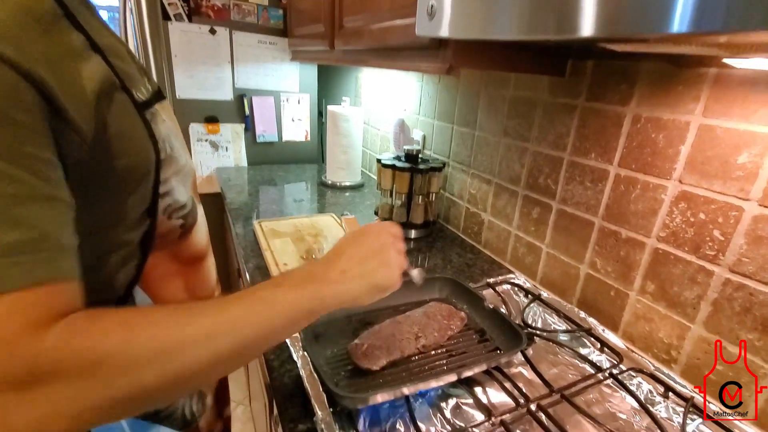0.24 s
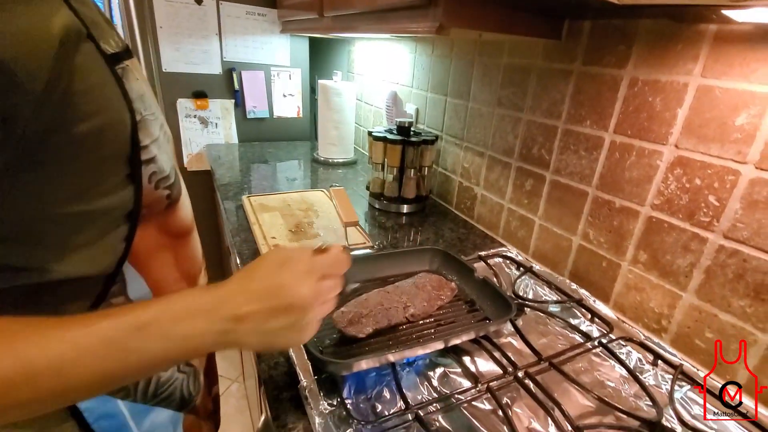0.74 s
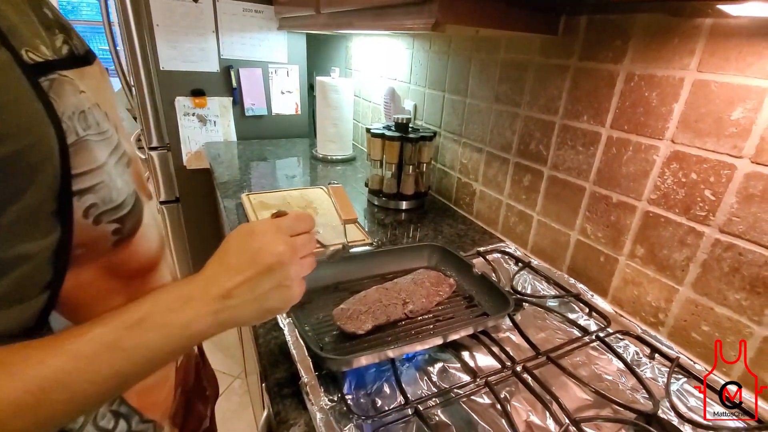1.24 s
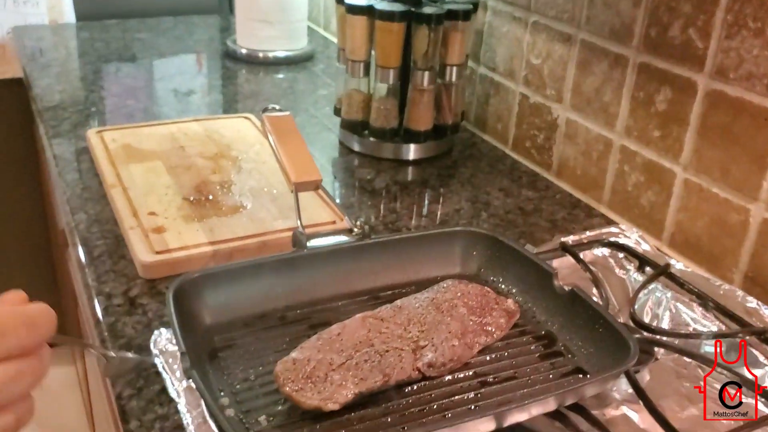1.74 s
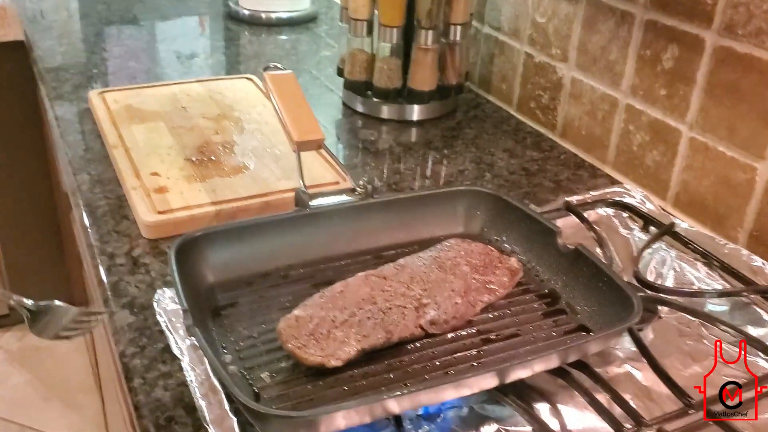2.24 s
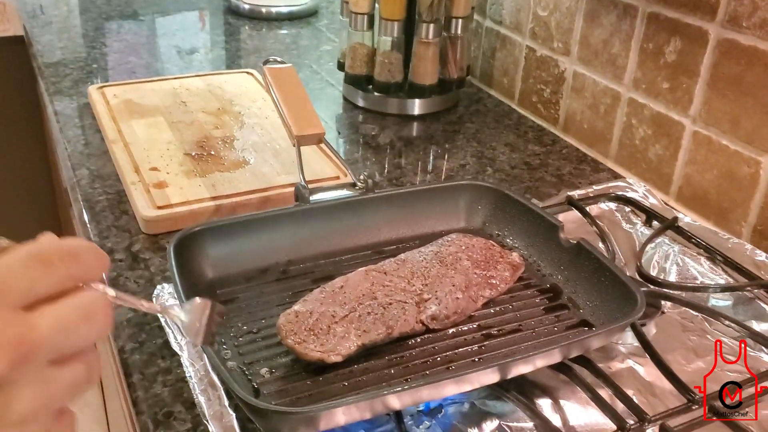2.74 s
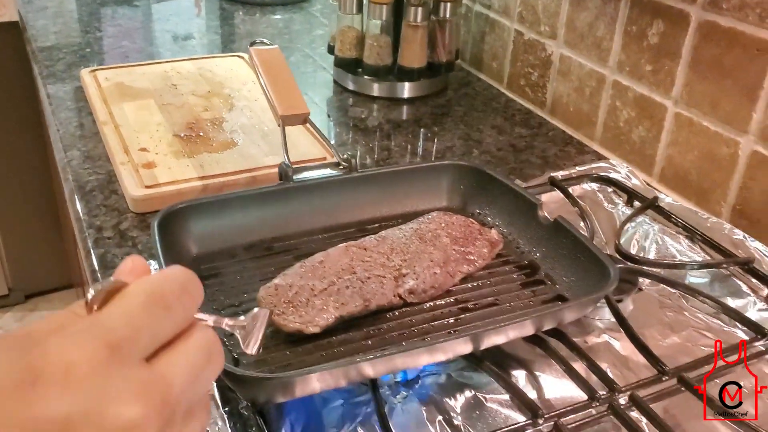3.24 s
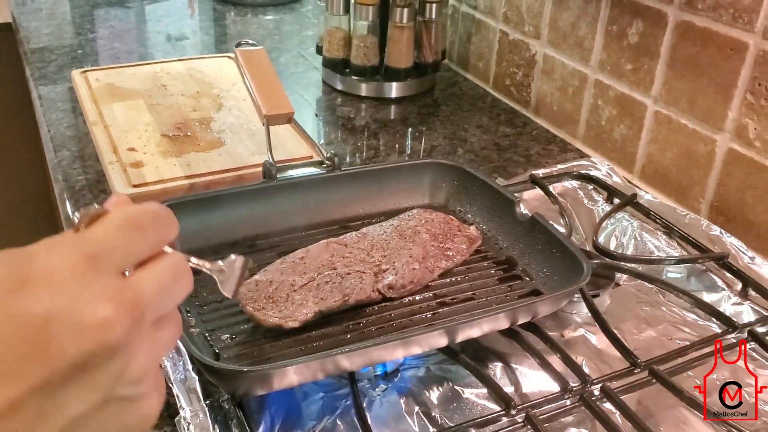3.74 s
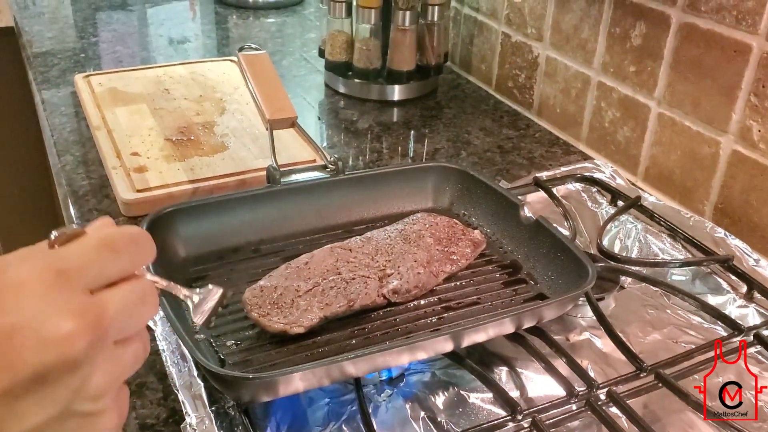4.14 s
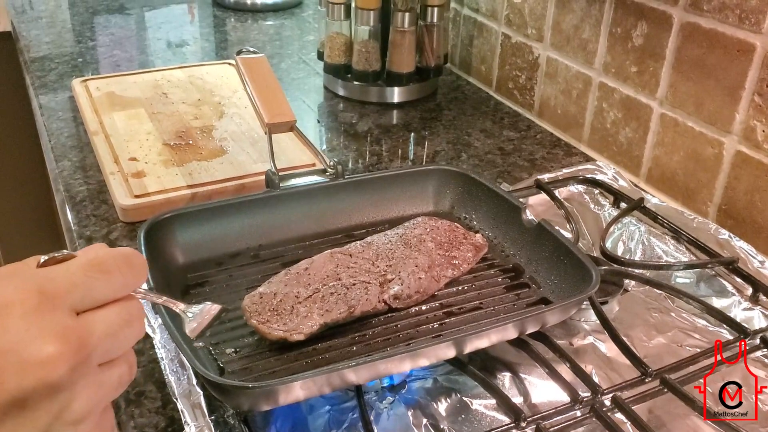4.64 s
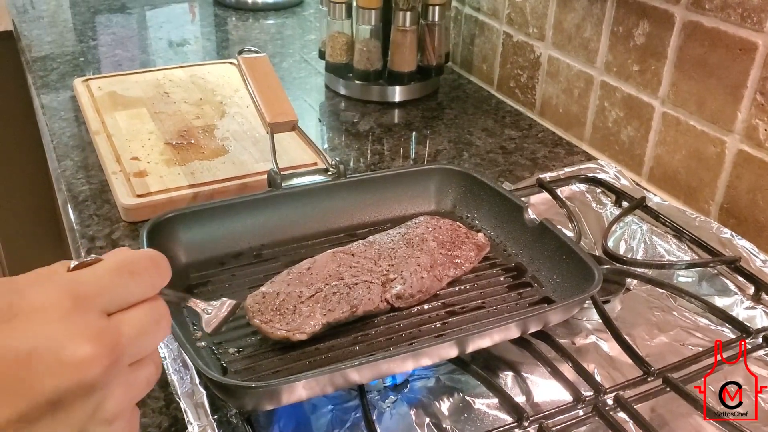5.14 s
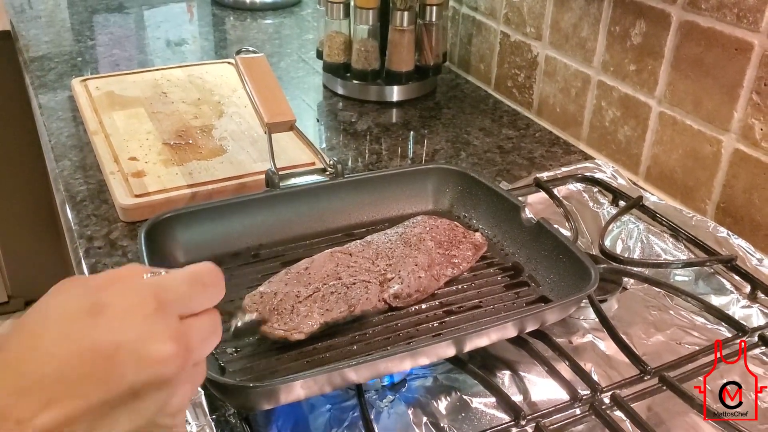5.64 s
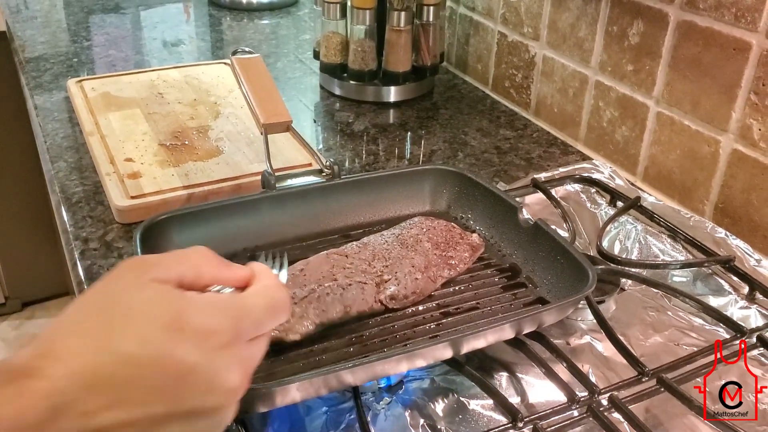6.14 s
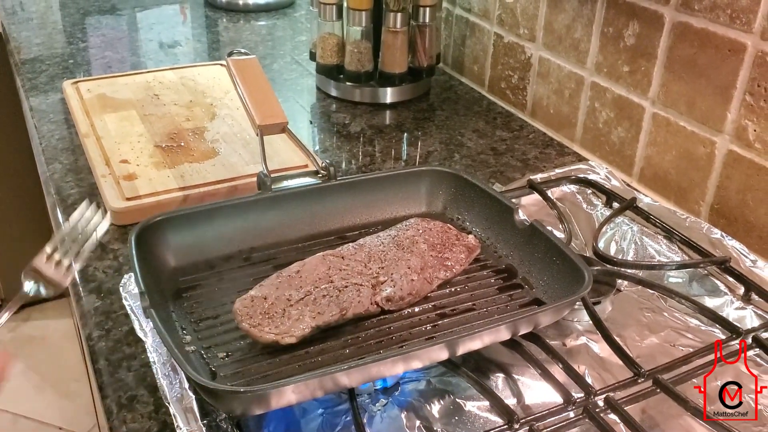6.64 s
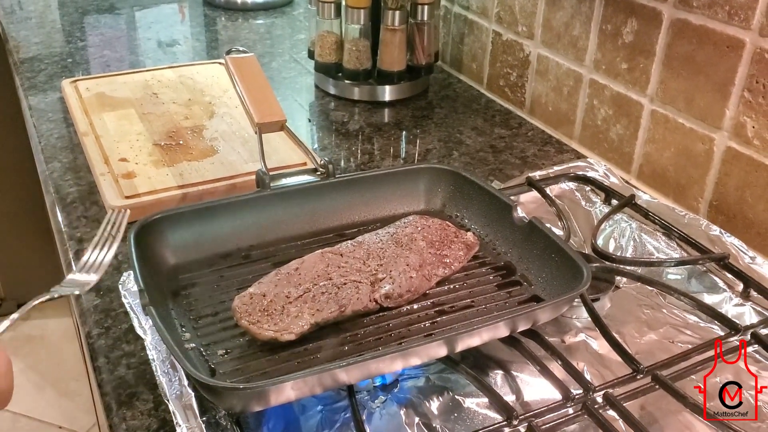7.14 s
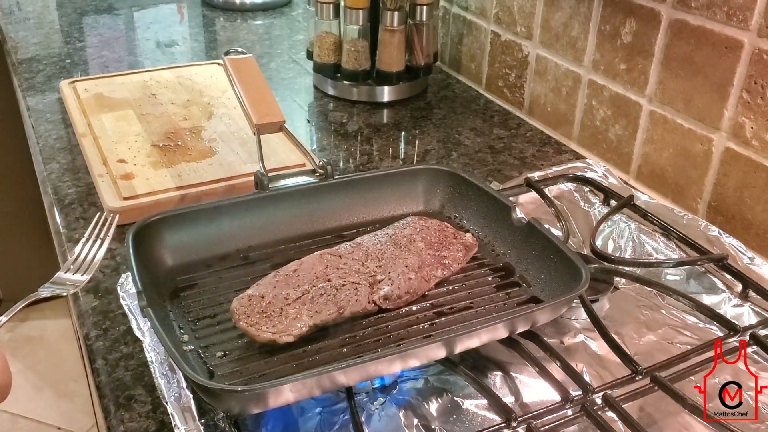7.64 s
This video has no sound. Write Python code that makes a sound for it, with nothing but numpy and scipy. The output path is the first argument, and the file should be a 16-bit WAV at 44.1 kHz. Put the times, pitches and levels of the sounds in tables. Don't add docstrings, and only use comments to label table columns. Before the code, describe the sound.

Two close microphones at a gas hob in a tiled home kitchen. Meat sizzles without pause for nearly 8 seconds: crisp high fizz over a coarser wet boil, uneven in tiny spurts. It begins with a brief fizzing surge; from 0.45 to 1 s there is a dense run of loud cracks, spits and dull bubble thuds, strongest near 0.65. From 1 to 3 s it is calmer, with a wet pop at 1.95 and a few snaps. Between 3 and 5.5 s small surges and scattered pops come left and right, the iron singing faintly. Around 6.05-6.4 s it spits busily, with soft low bumps from the cook, as also near 0.5, 1.1 and 7.2. Sparse crackles continue to the end. Quietly beneath, the flame flutters and roars in gusts, with beating mains hum and a thin motor whine.

```python
import sys
import numpy as np
from scipy import signal
from scipy.fft import rfft, irfft, next_fast_len
from scipy.io import wavfile
from scipy.ndimage import uniform_filter1d, map_coordinates

SR = 44100
rng = np.random.default_rng(int(sys.argv[2]) if len(sys.argv) > 2 else 0)


def to_wav(sig):
    pcm = np.clip(np.atleast_2d(sig), -1, 1) * 32767
    pcm = np.round(pcm).astype(np.int16)
    wavfile.write(sys.argv[1], SR, pcm.T)


def field_ratio(decibels):
    return 10 ** (np.asarray(decibels, dtype=float) / 20)


N = 347949

# [t/s, length/s, fizz rise/dB, boil rise/dB]
SURGES = [(0, 0.025, 6.5, 2.5), (.45, 0.13, 3, 6.5), (.64, .03, 0.5, 9), (.7, .08, -0.5, 2.5),
          (1.59, 0.044, .6, 3.5), (1.94, .03, -1, 2), (3.1, 0.077, 1.5, -0.7), (3.58, .07, 2, 1.2),
          (3.82, 0.097, 1, 1.5), (4, 0.18, 3, 0.5), (4.27, 0.057, 3, 1.5), (4.43, 0.1, 2.5, 1),
          (4.69, 0.058, 2.5, 2.5), (5.098, 0.1, 2.5, 4.5), (5.245, 0.045, 3, 4.5), (5.44, .05, 0.8, 3),
          (5.85, 0.11, 2.2, 0.8), (6.05, 0.2, 4, 4.5), (6.28, .11, 1.5, 3.5), (7.03, 0.047, 0.5, 2),
          (7.8, 0.097, 1, 2)]
SURGE_RISE_S, SURGE_FADE_S = 0.015, 0.05


def unit(x):
    return x / np.sqrt(np.mean(x ** 2) + 1e-20)


def along(points, hz):
    f, v = np.transpose(points)
    return np.interp(np.log(hz + 1), np.log(f + 1), v)


def curves(rows):
    s, *columns = np.transpose(rows)
    return [np.interp(np.arange(N) / SR, s, column) for column in columns]


def swells(rows, rise_s, fade_s):
    t = np.arange(N) / SR
    out = 0
    for s, length, *heights in rows:
        rise = (t - s) / rise_s + 0.5
        fade = (s + length - t) / fade_s + 0.5
        out = out + np.outer(heights, np.clip(np.minimum(rise, fade), 0, 1))
    return out


def wobble(rate):
    points = rng.standard_normal(int(N * rate / SR) + 4)
    return map_coordinates(points, [np.arange(N) * rate / SR])


def filtered(x, response):
    m = next_fast_len(N + SR // 2)
    return irfft(rfft(x, m) * response(np.fft.rfftfreq(m, 1 / SR)), m)[..., :N]


def sides(db):
    return field_ratio(np.outer([0.5, -0.5], db))


def spaced(pair, spectrum):
    # [f/Hz, likeness 0-1]
    likeness = [(100, 0.91), (350, 0.8), (800, 0.59), (1100, 0.38), (1300, 0.46), (1600, 0.33), (2500, 0.4),
                (4000, 0.18), (5000, 0.08), (5500, 0.29), (6300, 0.07), (15000, .06)]

    def shares(hz):
        turn = np.arccos(np.clip(along(likeness, hz), -1, 1)) / 2
        return field_ratio(along(spectrum, hz)) * [np.cos(turn), np.sin(turn)]

    mid, side = filtered(pair, shares)
    return unit(np.array([mid + side, mid - side]))


def narrow(hz, width_hz, alike):
    noise = rng.standard_normal((3, N))

    def resonance(f):
        return 1j * f * width_hz / (hz * hz - f * f + 1j * f * width_hz)

    return unit(filtered(noise[:2] + alike * noise[2], resonance))


def burst(rows, lo_hz, hi_hz, t60, alike):
    t = np.arange(SR // 16) / SR
    out = np.zeros((2, N + SR // 16))
    band = np.clip([lo_hz, hi_hz], 50, SR / 2.2)
    sos = signal.butter(2, band, "bandpass", fs=SR, output="sos")
    decay = field_ratio(-60 * t / t60) + field_ratio(-19 - 60 * t / 0.11)
    shape = (1 - np.exp(-t / 0.0002)) * decay
    for s, db, pan_db in rows:
        noise = rng.standard_normal((3, len(t)))
        pop = signal.sosfilt(sos, (noise[:2] + alike * noise[2]) * shape)
        pop = pop / np.abs(pop).max(1, keepdims=True)
        start = round(s * SR)
        out[:, start:start + len(t)] += field_ratio(db) * sides(pan_db) * pop
    return out[:, :N]


def rings(rows, attack_s):
    t = np.arange(SR // 4) / SR
    out = np.zeros((2, N + SR // 4))
    for s, db, hz, t60 in rows:
        phase = 2 * np.pi * hz * t + 0.33 * rng.standard_normal((2, 1))
        envelope = field_ratio(db - 60 * t / t60) * (1 - np.exp(-t / attack_s))
        start = round(s * SR)
        out[:, start:start + len(t)] += envelope * np.sin(phase)
    return out[:, :N]


def flame():
    # [f/Hz, level/dB per Hz]
    flutter_colour = [(13, -44), (22, -25), (54, 2), (92, 4.5), (115, 5.5), (150, -35), (250, -120)]
    # [f/Hz, level/dB per Hz]
    roar_colour = [(76, -39), (130, -7), (183, -7.5), (301, -3), (443, -10.5), (537, -13.5), (550, -5),
                   (720, -31), (1210, -120)]
    # [t/s, length/s, roar rise/dB, flutter rise/dB]
    gusts = [(.45, .3, 7.5, 13), (1.25, 0.5, 9.5, 2), (2.08, 0.17, 10.5, 6), (2.4, .2, 5, 4),
             (2.75, 0.37, 7, 0), (3.2, 0.14, 8, 9), (3.95, 0.42, 9.5, 6), (5.08, 0.27, 4, 0),
             (5.45, 0.14, 4, -3), (6.05, 0.16, 6, 16), (6.35, .15, 4, 7), (7.1, .35, 10, 7)]
    roar_db, flutter_db = swells(gusts, rise_s=0.13, fade_s=0.15)
    flutter = spaced(rng.standard_normal((2, N)), flutter_colour)
    roar = spaced(rng.standard_normal((2, N)), roar_colour)
    return field_ratio(-69 + flutter_db + wobble(7.9)) * flutter + field_ratio(-68.5 + roar_db + wobble(13)) * roar


def motor_and_mains():
    # [f/Hz, level/dB]
    throbs = [(56.65, -76.5), (58.8, -69.5), (60.01, -69.5)]
    # [f/Hz, level/dB]
    hums = [(120.02, -70), (903, -72.5)]
    # [t/s, level/dB]
    motor_strength = [(0, -7), (1.2, -5.5), (1.7, -2), (4.5, 1.2), (5.3, -1), (7.89, 0.5)]
    motor_db, = curves(motor_strength)
    in_step_s, lag_s = 5.79, 0.0012
    t = np.arange(N) / SR
    out = np.zeros((2, N))
    for hz, db in throbs:
        throb = np.cos(2 * np.pi * hz * (t - in_step_s + [[lag_s], [0]]))
        out += field_ratio(db + 2 + motor_db) * throb
    whine = (577, -61 + motor_db)  # Hz, dB
    for hz, db in hums + [whine]:
        tone = np.sin(2 * np.pi * hz * t + 0.32 * wobble(9))
        out += field_ratio(db + 5 + 1.05 * wobble(7.4)) * tone
    return out


def cook():
    # [t/s, peak level/dB, f/Hz, time to fade by 60 dB/s]
    bumps = [(0.04, -51, 118, 0.2), (0.458, -43, 150, 0.14), (0.55, -44, 80.7, 0.11),
             (1.072, -39, 77.6, 0.13), (5.475, -47, 75.4, 0.12), (6.058, -41, 86.1, 0.12),
             (6.199, -41, 72.7, 0.14), (6.37, -45, 88.8, 0.12), (7.249, -50, 88.8, 0.12)]
    return field_ratio(0.5) * rings(bumps, attack_s=0.0056)


def pan():
    # [t/s, peak level/dB]
    thuds = [(0.45, -49), (0.493, -34), (0.524, -46), (0.616, -45), (0.65, -25), (0.737, -47), (0.758, -42),
             (0.972, -43), (1.586, -34.5), (1.687, -30), (1.953, -44), (2.183, -39), (2.416, -34.5),
             (3.001, -41), (3.216, -30.5), (3.245, -34), (3.261, -32.5), (5.257, -35), (6.057, -36),
             (7.062, -39)]
    # [f/Hz, width/Hz, resting level/dB]
    iron_modes = [(1728, 19, -59.5), (1952, 57, -60), (3014, 140, -58), (3660, 120, -65)]
    # [t/s, length/s, rise/dB]
    singing = [
        [(3.03, 0.33, 11.5), (3.5, .3, 7), (4.3, 0.55, 10.5), (5.05, .9, 10), (6.9, 0.82, 7)],
        [(.45, 0.56, 12), (3.5, 0.26, 12), (3.9, .9, 6), (5.05, 0.23, 2)],
        [(4.1, .7, 9), (5.05, 0.95, 7), (6.05, 0.26, 11), (6.8, .5, 5)],
        [(2.198, 0.13, 15)],
    ]
    out = burst([(s, db + 0.5, 0) for s, db in thuds], 510, 1600, t60=0.047, alike=1.5)
    fed_db = swells(SURGES, SURGE_RISE_S, SURGE_FADE_S)[1]
    for (hz, width_hz, db), spells in zip(iron_modes, singing):
        sing_db = swells(spells, rise_s=0.074, fade_s=0.19)
        out += field_ratio(db + fed_db + sing_db) * narrow(hz, width_hz, alike=0.99)
    return out


def pops():
    # [t/s, peak level/dB, brightness, twice the left-right difference/dB]
    fat_drops = [(.2024, -10, 0.098, 1.5), (.526, -7, -0.61, -8), (.541, -11.5, -.6, -6),
                 (0.6522, -3.5, -0.82, -6), (.7041, -6.5, -0.049, 1.5), (0.7602, -4.5, -0.27, 9),
                 (.7881, -10, .8, 5), (.9118, -11, 0.87, 9), (.9472, -13, 0.7, 4), (1.974, -18, .1, 1.2),
                 (2.2835, -14, -0.056, 1.5), (2.606, -21, 0.48, 2.2), (2.702, -10, -0.039, 1.5),
                 (2.9063, -13, 0.28, -4), (2.9907, -15, 0.32, -2.2), (3.0862, -11, -0.84, -.6),
                 (3.284, -16, -.4, 1.2), (4.001, -15, -0.83, 1.5), (4.4683, -9, 1.1, 4),
                 (4.9097, -11, .7, 2.2), (6.1558, -10.5, .1, .6), (6.164, -13, .1, .6),
                 (6.207, -6, 1.1, -1), (6.2931, -8, .6, 1), (6.7386, -12.5, 0.43, -6),
                 (6.772, -10, 0.85, 3), (7.0321, -14.5, 0.35, 4), (7.347, -14, -.8, 7),
                 (7.6171, -15, .4, 3), (7.8012, -14, 0.77, 3)]
    # [t/s, peak level/dB, brightness, twice the left-right difference/dB]
    juice_drops = [(0.1412, -9, .1, .3), (.618, -9.5, -.6, -8), (.757, -11, -0.3, -14), (.97, -20, .1, .6),
                   (1.249, -19, -0.95, 1.2), (1.586, -16, -1.2, 10), (1.8527, -20, -0.76, .6),
                   (1.9543, -6, 0.2, 0), (2.1963, -17, 0.46, 1.2), (2.246, -19, -0.088, -1),
                   (2.883, -17, -.2, 1.5), (3.2323, -14, .5, -1.2), (3.494, -14, -0.45, -2),
                   (3.8278, -10, 0.3, 15), (3.8748, -13, -0.5, 4), (4.039, -18, .4, -3),
                   (4.1198, -17, .1, .6), (4.243, -11.5, -0.2, -6), (5.0987, -14, 0.099, 8),
                   (5.25, -9, -0.5, -3), (5.29, -11.5, .3, 5.5), (5.4393, -14, .6, 4),
                   (6.0598, -11, -.3, 6), (6.1844, -12, 0.42, -5), (6.3946, -12, 0.41, 4),
                   (7.0625, -11, -0.7, 3), (7.5802, -9, .4, -6), (7.6949, -15, .1, 2.5),
                   (7.8462, -15, 0.3, -1.2)]
    # dB against the peak, then dB per step of brightness
    dry_db, wet_db = (-18.5, -14, -5.5, -6), (-18, -12.5, -6, -8)
    bright_db = (-6, -5, -1, 1)
    s, db, bright, pan_db = np.transpose(fat_drops + juice_drops)
    kind_db = np.transpose([dry_db] * len(fat_drops) + [wet_db] * len(juice_drops))
    body_db, snap_db, crack_db, spray_db = db + kind_db + np.outer(bright_db, bright)
    s = s + 0.0006
    side_db = 0.5 * pan_db
    out = burst(zip(s, body_db, side_db), 1140, 2940, t60=0.022, alike=1.0)
    out += burst(zip(s, snap_db, side_db), 2700, 5300, t60=0.0047, alike=0.4)
    out += burst(zip(s, crack_db, side_db), 4800, 7600, t60=0.005, alike=0.2)
    out += burst(zip(s, spray_db, side_db), 8000, 16000, t60=0.003, alike=0.1)
    return out


def bubbles(per_s, spread_db, t60, busy_db):
    t = np.arange(768) / SR
    out = np.zeros((2, N))
    for _ in range(3):
        bursts = rng.random(N) < per_s / 3 / SR
        sizes = field_ratio(spread_db * np.minimum(rng.exponential(size=N), 3) + busy_db)
        decay = field_ratio(-60 * t / t60) + field_ratio(7.5 - 60 * t / 0.0014)
        scatter = rng.standard_normal((2, len(t))) * decay
        out += signal.oaconvolve((bursts * sizes)[None], scatter, axes=1)[:, :N]
    return unit(out)


def patchy(pair, depth_db):
    z = signal.stft(pair, nperseg=256)[2]
    field = rng.standard_normal(z.shape[1:])
    field = uniform_filter1d(field, size=3, axis=0)
    field = uniform_filter1d(field, size=12, axis=1)
    return signal.istft(z * field_ratio(depth_db * unit(field)), nperseg=256)[1][:, :N]


def sizzle():
    # [t/s, fizz level/dB, boiling juice above the fizz/dB]
    heat = [(0, -31, -9), (.8, -31, -7), (1.1, -33, -7.5), (2.1, -34, -6.5), (3.2, -32.5, -7.5),
            (3.75, -34, -7), (5, -32, -9), (5.65, -33.5, -7), (6.5, -33, -8.5), (7.89, -32.5, -8)]
    # [t/s, share 0-1]
    facing_pan = [(0, 0.24), (1.4, 0.26), (2.5, 0.4), (3.5, 0.33), (4.5, 0.85), (6, 0.75), (7.89, 1)]
    # [f/Hz, level/dB per Hz]
    fizz_ahead = [(2000, -33.5), (3500, -11), (4850, -11.5), (6000, -4), (6850, 5), (7400, -2), (8040, -3),
                  (10000, -5), (13000, -4.5), (16500, -6)]
    # [f/Hz, level/dB per Hz]
    fizz_aside = [(2000, -29.5), (3500, -14), (4850, -7), (5800, 1.5), (6500, 1), (7200, 1), (8040, -7),
                  (10000, -4), (13000, -3.5), (16500, -5.5)]
    # [f/Hz, level/dB per Hz]
    juice_colour = [(260, -28), (450, -20.5), (640, -15.5), (780, -12.5), (950, -10.5), (1060, -11.5),
                    (1280, -5), (1820, -3.5), (2050, -2), (2300, -1.1), (2900, 1), (3800, -4.5), (5000, -3),
                    (6500, -6.5), (11000, -120)]
    heat_db, wet_db = curves(heat)
    fizz_db, boil_db = swells(SURGES, SURGE_RISE_S, SURGE_FADE_S) + [heat_db, heat_db + wet_db]
    spurts_db = 0.5 * wobble(14) + 1.4 * wobble(45)
    steam = patchy(rng.standard_normal((4, N)), depth_db=1.5)

    fine = field_ratio(-5) * bubbles(2500, spread_db=3, t60=0.0057, busy_db=spurts_db)
    fine += field_ratio(-2.5) * steam[:2]
    fine += field_ratio(-14) * bubbles(90, spread_db=3, t60=0.003, busy_db=0)
    juice_db = 0.75 * spurts_db + 0.6 * wobble(20)
    coarse = field_ratio(-2) * bubbles(1500, spread_db=2, t60=0.012, busy_db=juice_db)
    coarse += field_ratio(-4) * steam[2:]
    coarse += field_ratio(-8.5) * fine

    facing = np.clip(curves(facing_pan)[0], 0, 1)
    fizz = facing * spaced(fine, fizz_ahead) + (1 - facing) * spaced(fine, fizz_aside)
    both = field_ratio(fizz_db + 3.5) * fizz + field_ratio(boil_db + 2.5) * spaced(coarse, juice_colour)
    turn_db = 1
    return both * sides(turn_db * (facing - facing.mean()))


def scene():
    return flame() + motor_and_mains() + cook() + pan() + pops() + sizzle()


def roll_off(x):
    return signal.sosfilt(signal.butter(12, 16980, fs=SR, output="sos"), x)


def record(dry):
    # [f/Hz, difference/dB]
    lean = [(60, -3), (170, -3.5), (300, 1), (950, -0.5), (1450, 5.5), (2000, 5.5), (3100, 0.5), (4500, -8),
            (5800, 3), (6800, 3.5), (7400, -0.5), (8000, 4), (9100, 1), (13000, 1.5)]
    # [f/Hz, phase lead of the left/rad]
    lead = [(300, 0), (580, 1.03), (780, -0.66), (1050, 0.43), (1350, 1.1), (1700, -2), (2000, -0.5),
            (3600, 0.5), (4600, -3), (5600, -4), (8000, -5)]
    top_hz = 15750

    def microphones(hz):
        phase = np.outer([0.5, -0.5], along(lead, hz))
        return sides(along(lean, hz)) * np.exp(1j * phase) * (hz < top_hz)

    return roll_off(filtered(dry, microphones))


dry = scene()
out = record(dry)
to_wav(out)
```